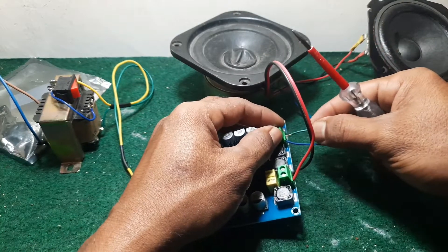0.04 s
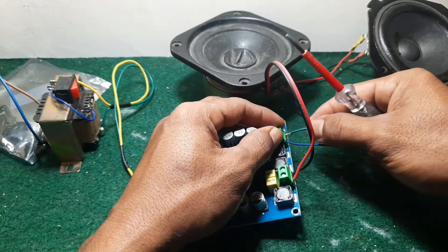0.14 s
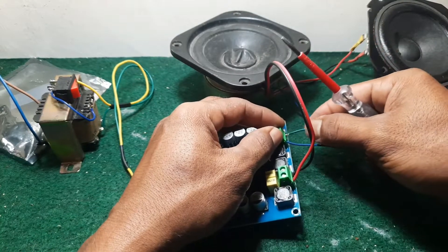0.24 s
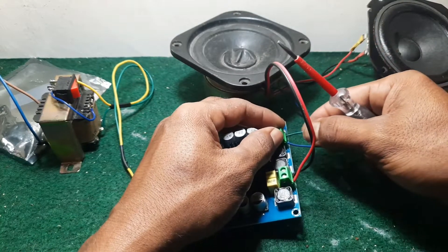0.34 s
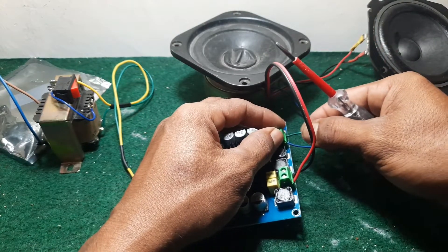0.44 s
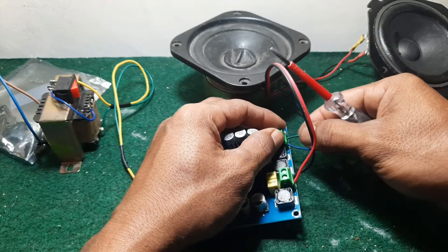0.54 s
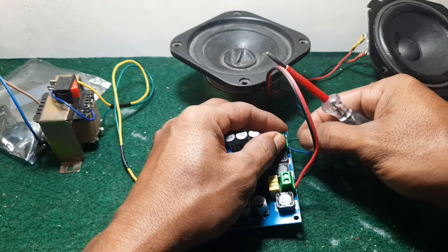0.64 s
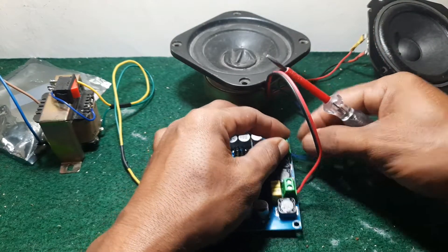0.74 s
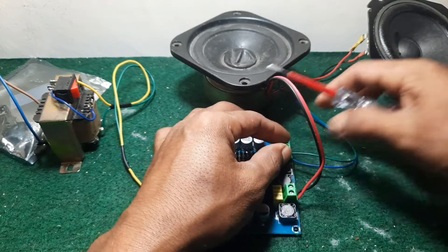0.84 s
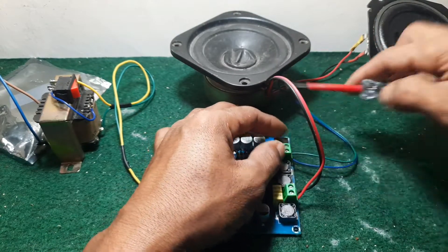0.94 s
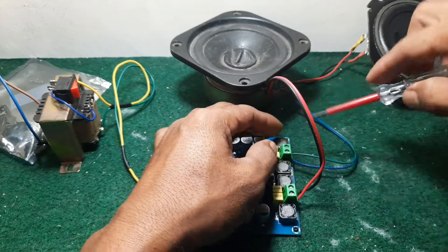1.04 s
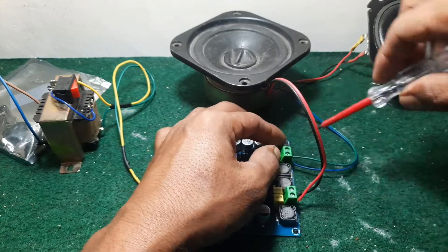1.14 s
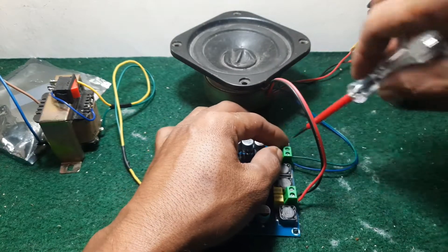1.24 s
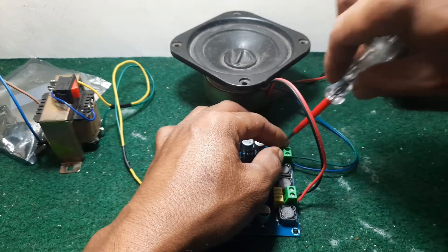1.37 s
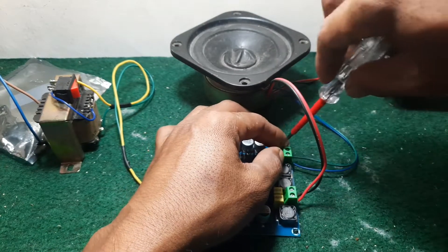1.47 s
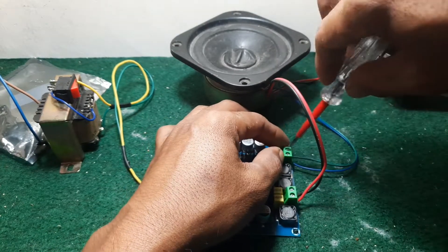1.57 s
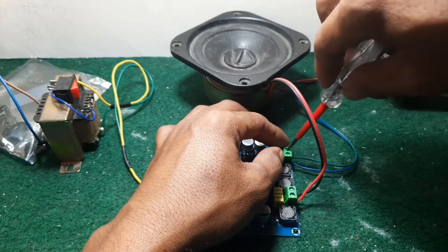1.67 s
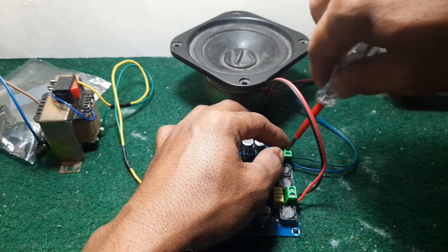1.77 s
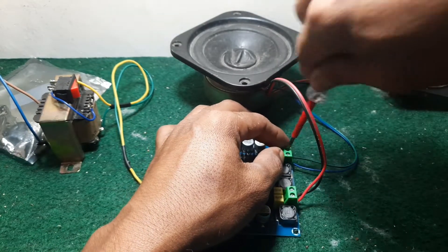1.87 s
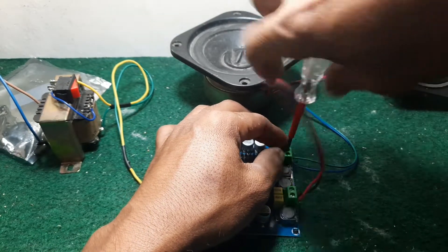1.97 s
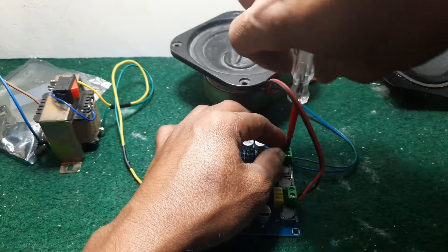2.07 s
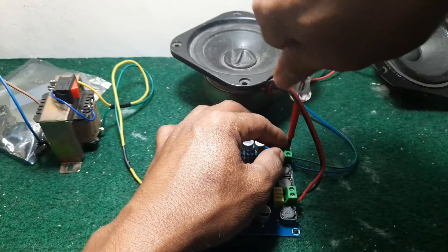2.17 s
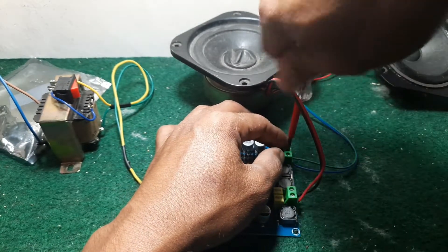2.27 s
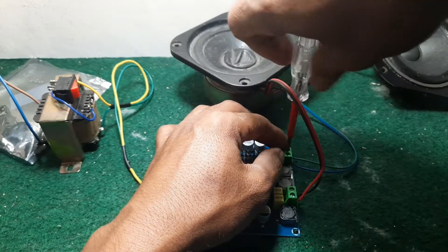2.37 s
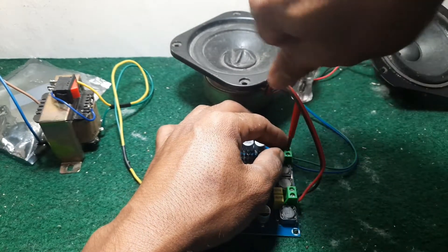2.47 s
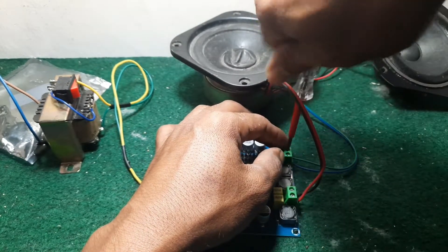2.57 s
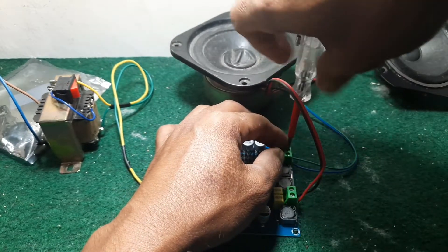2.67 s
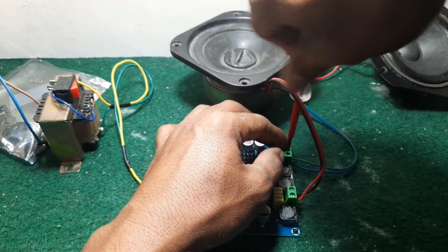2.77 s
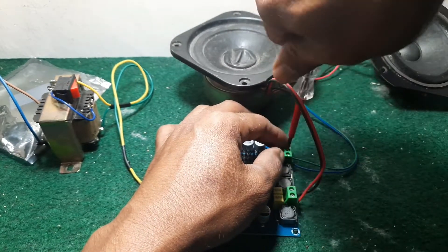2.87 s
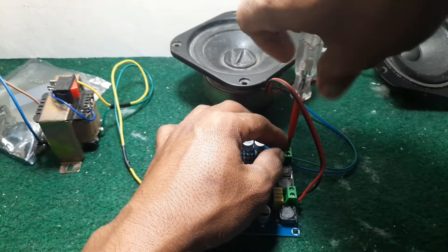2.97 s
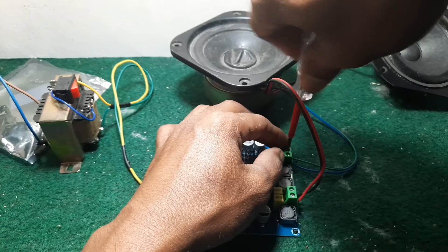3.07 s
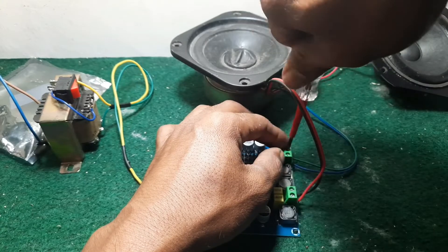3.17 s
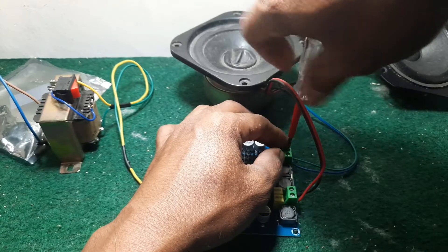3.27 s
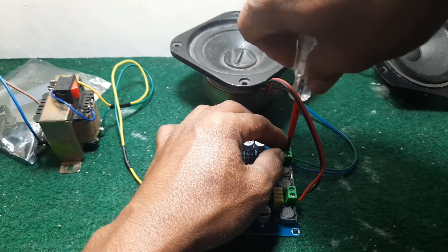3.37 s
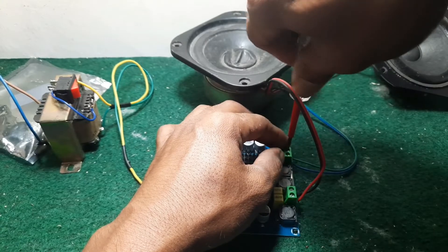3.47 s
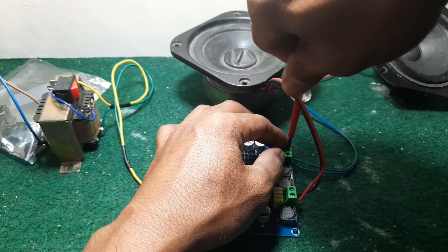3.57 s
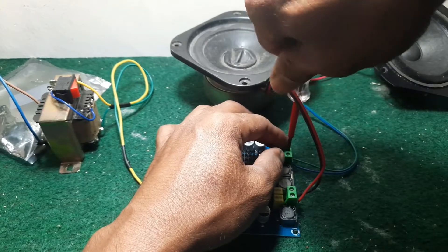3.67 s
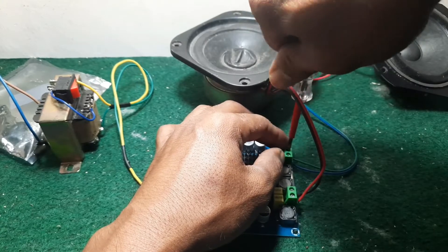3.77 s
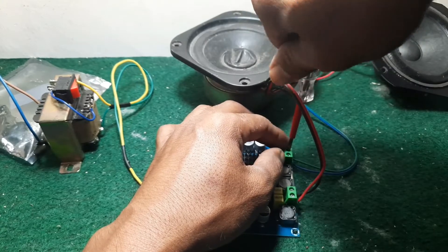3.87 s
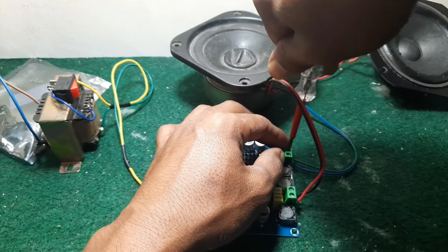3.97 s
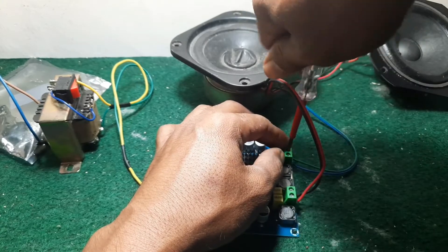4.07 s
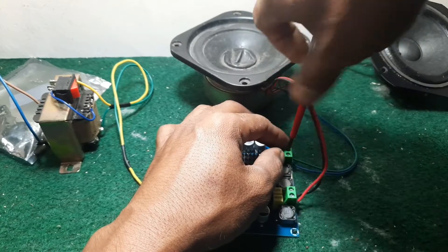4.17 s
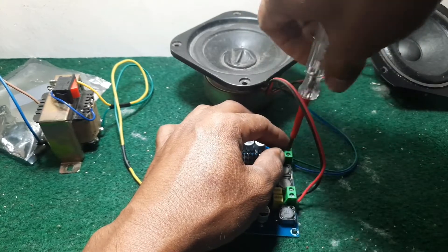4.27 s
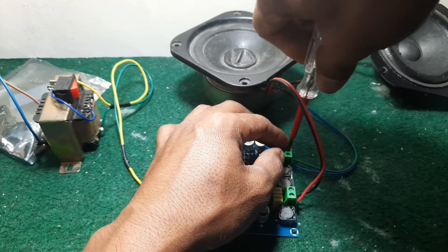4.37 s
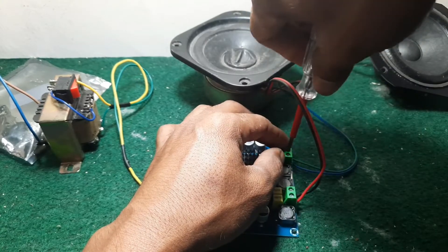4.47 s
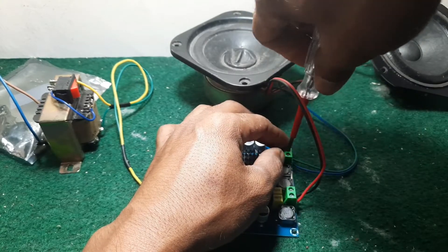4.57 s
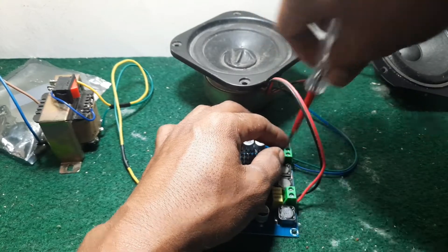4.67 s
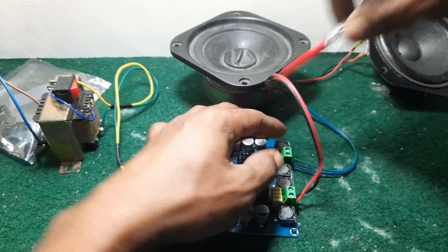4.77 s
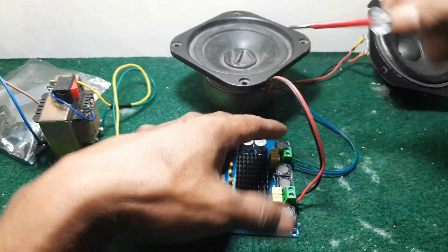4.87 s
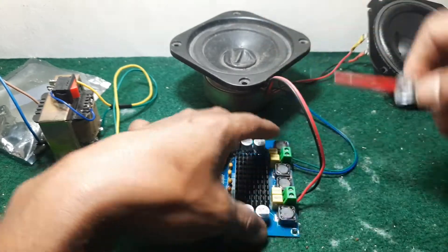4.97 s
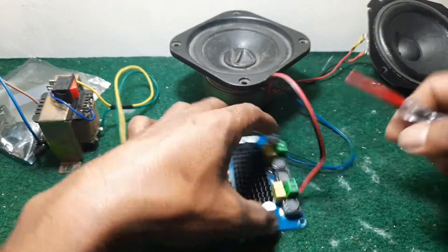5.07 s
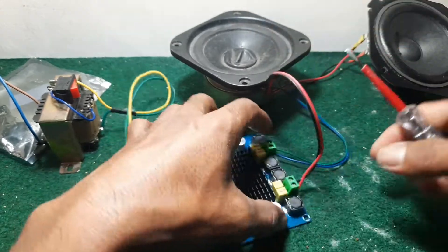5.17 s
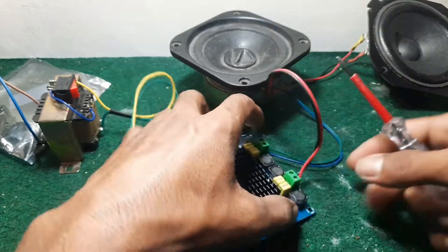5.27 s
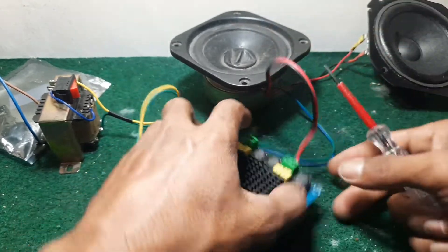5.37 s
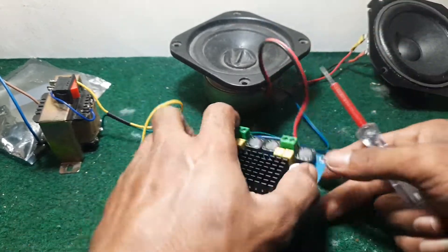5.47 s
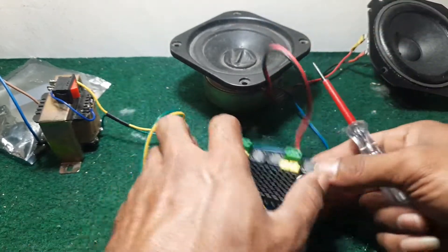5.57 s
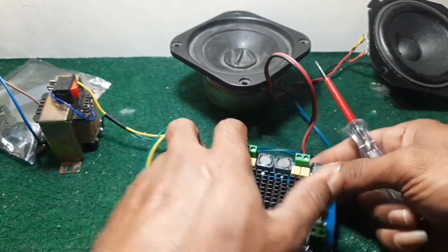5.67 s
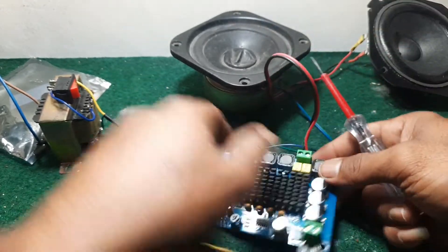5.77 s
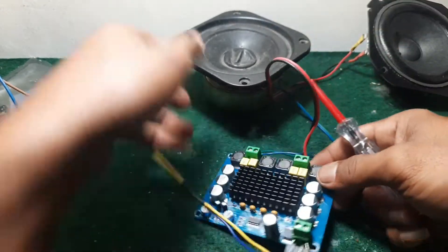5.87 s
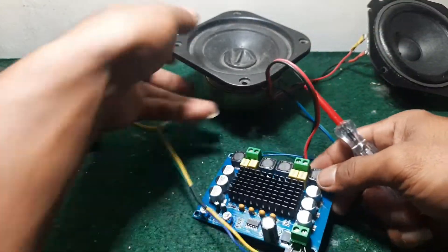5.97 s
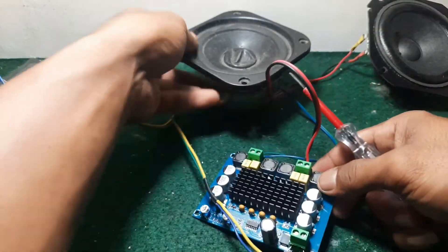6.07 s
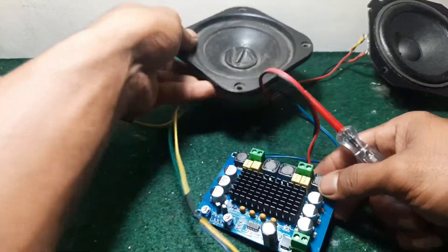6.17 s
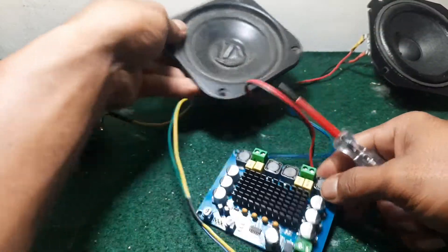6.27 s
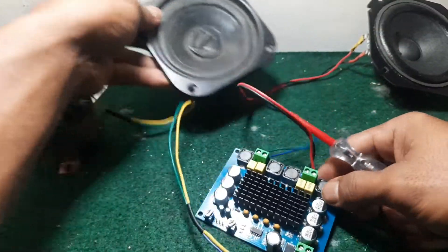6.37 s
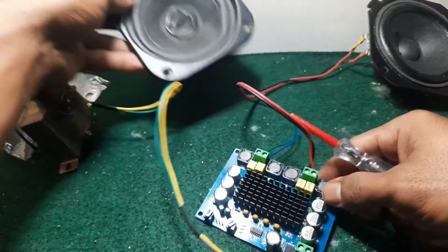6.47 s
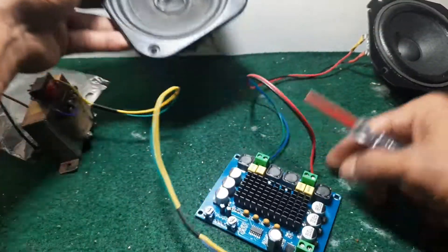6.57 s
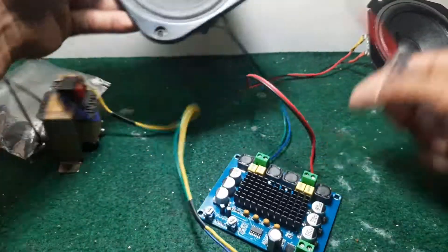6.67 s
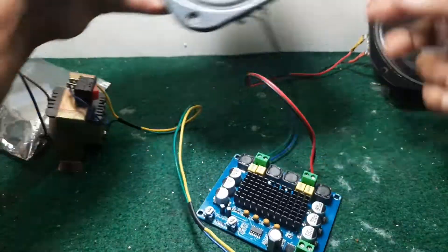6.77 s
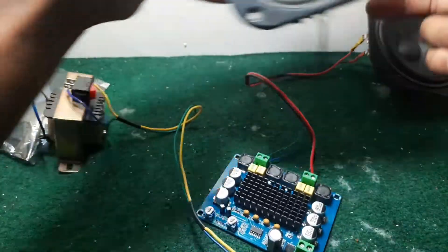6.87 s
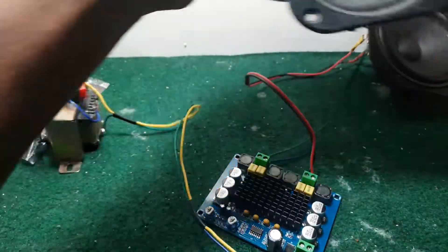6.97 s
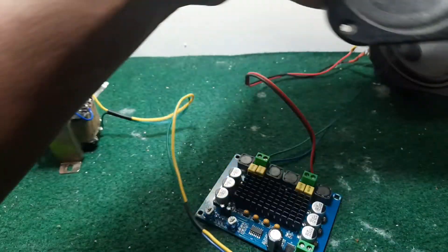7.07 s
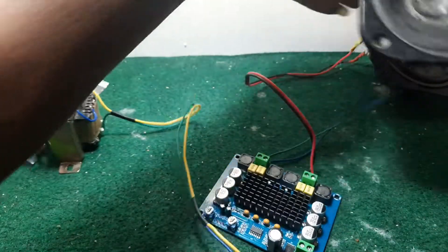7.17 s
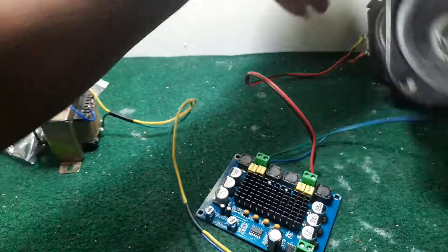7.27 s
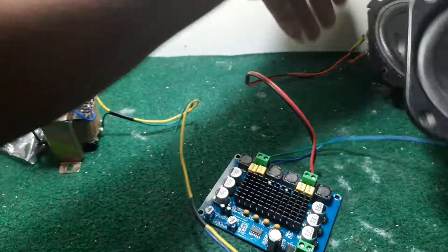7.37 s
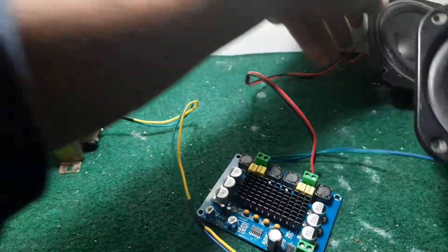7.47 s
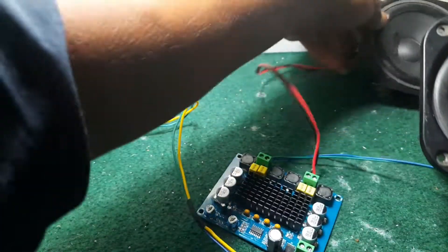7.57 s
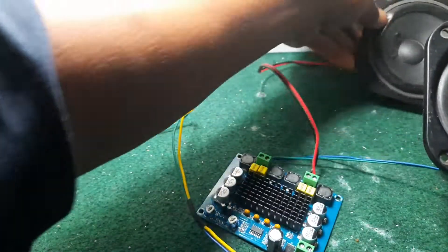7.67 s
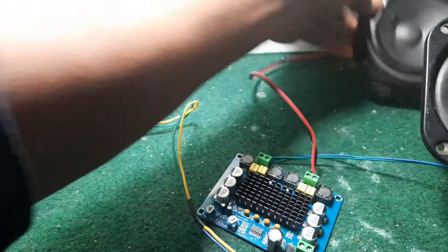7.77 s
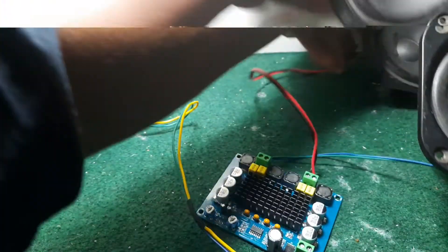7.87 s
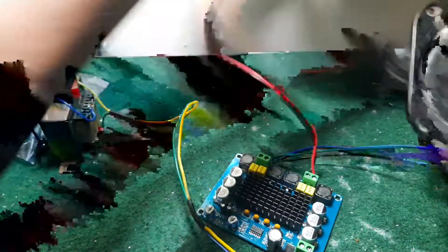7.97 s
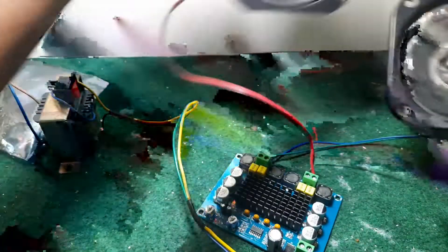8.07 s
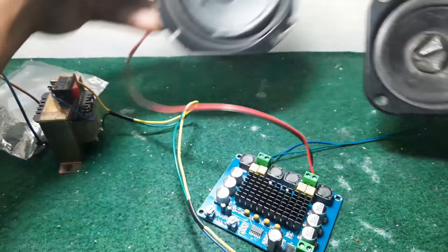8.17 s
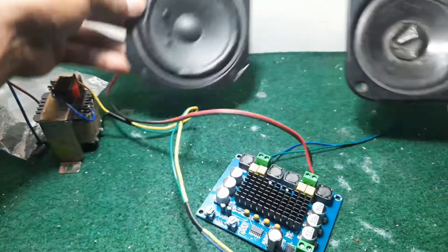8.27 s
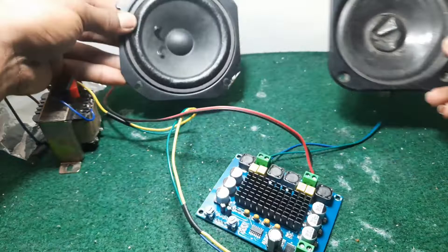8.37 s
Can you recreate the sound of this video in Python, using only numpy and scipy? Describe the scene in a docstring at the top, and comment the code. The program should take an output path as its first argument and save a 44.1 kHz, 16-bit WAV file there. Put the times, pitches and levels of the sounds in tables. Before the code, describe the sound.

Low room hum and hiss, soft bench thumps and faint screwdriver ticks, then sharp clicks, rustling drags, a thin squeak and heavier knocks close up.

```python
"""A low room hum under microphone hiss, and the rumble of hands leaning on a carpeted bench, are heard first.
Close to a two-microphone phone standing there, hands fit wires into screw terminals: ticks are noise cracks
ringing a board, rustles are grainy noise, and knocks ring the bench modes and set loose things rattling.
Steel clinks are ringing modes; creaks and a very high squeak are wavering sines. Rows of small ticks chatter.
A short room tail follows the ticks, clinks and squeaks."""
import sys
import numpy as np
from scipy import signal
from scipy.fft import rfft, irfft
from scipy.io import wavfile
from scipy.ndimage import uniform_filter1d

SR = 44100
rng = np.random.default_rng(int(sys.argv[2]) if len(sys.argv) > 2 else 0)


def to_wav(s):
    """Save 16-bit WAV."""
    ch = np.atleast_2d(s).T  # columns
    pcm = np.round(np.clip(ch, -1, 1) * 32767)  # PCM
    wavfile.write(sys.argv[1], SR, pcm.astype(np.int16))


N = 371757

# blows on the bench; the lean favours the low modes:
# start_s, level_db, lean_db_per_octave, contact_ms
BLOWS = [(0.6, -23, 11, 1.2), (1.753, -20.5, -7, 2), (1.804, -17.5, -7, 2.3), (1.8113, -8.5, -0.5, 2.9),
         (2.016, -18, 2, 3.4), (2.206, -21.5, -8.5, 2.8), (2.331, -9.5, -3.5, 3.7), (2.658, -6.5, 4, 4.4),
         (2.969, -18.5, -8.5, 3.1), (3.326, -8, -1.5, 3.7), (3.426, -27, -5, 1.8), (3.457, -15, -9, 5.2),
         (3.646, -16, 0.5, 2), (4.017, -9, 9, 1.6), (4.078, -21, -11.5, 1.7), (4.176, -29, -11, 2.3),
         (4.196, -10.5, 0.5, 1.8), (4.374, -18, -7.5, 2.5), (4.698, -15, -6.5, 3.8), (4.867, -26, 3, 2),
         (5.097, -11.5, 13, 8.1), (5.792, -19, 9, 2.1), (5.897, 3, 11.5, 1.65), (6.403, -9.5, 17.5, 3.9),
         (6.417, -7.5, 12, 2.9), (6.635, 10.5, 6.5, 3.5), (6.662, -20, 16.5, 2.2), (6.756, -7.5, 10, 6.2),
         (6.768, -24, 11, 4.2), (6.83, -20, 15, 3.7), (6.835, -29, -16, 1.2), (7.106, -22, -3.5, 1.6)]
# ringing modes of the circuit board: mode_hz, level_db, t60_s
BOARD_MODES = [(970, -19.5, 0.0034), (1050, -2, 0.025), (1180, -7, 0.012), (1360, 5, 0.021),
               (1490, 0, 0.033), (1800, 13.5, 0.0079), (2036, 15, 0.021), (2360, 2.5, 0.01),
               (2700, -1, 0.012), (3040, 14.5, 0.021), (4600, -15, .04)]


def undb(db):
    """Turn decibels into an amplitude factor."""
    return 10 ** (np.asarray(db) / 20)


def unit(x):
    """Scale to an rms of 1."""
    return x / np.sqrt(np.mean(x ** 2))


def peak1(x):
    """Scale each channel to a peak of 1."""
    return x / np.abs(x).max(axis=-1, keepdims=True)


def butter(x, order, hz, kind):
    """Filter x with a Butterworth high-pass or band-pass."""
    return signal.sosfilt(signal.butter(order, hz, kind, fs=SR, output="sos"), x)


def on_log(table, hz):
    """Read a (Hz, value) table along a log axis."""
    table_hz, values = np.transpose(table)
    return np.interp(np.log(hz + 1), np.log(table_hz), values)


def colour(x, table):
    """Weight the spectrum of x by a (Hz, dB) table."""
    size = x.shape[-1]
    hz = np.arange(size // 2 + 1) * SR / size
    return irfft(rfft(x) * undb(on_log(table, hz)), size)


def ring(x, hz, t60_s):
    """Drive one decaying mode with x: a unit impulse rings with amplitude 1."""
    pole = np.exp(2j * np.pi * hz / SR - np.log(1000) / (t60_s * SR))
    return signal.lfilter([1], [1, -pole], x, axis=-1).imag


def walk(rate, size=N):
    """Random levels held 1 / rate s and smoothed twice; spread near 1."""
    hold = int(SR / rate)
    steps = np.repeat(rng.standard_normal(size // hold + 1), hold)
    return 1.3 * uniform_filter1d(uniform_filter1d(steps, hold), hold)[:size]


def lean_sides(pan_db):
    """Left and right gains that differ by pan_db, left minus right."""
    return undb(np.array([pan_db, -pan_db]).reshape(2, -1) / 2)


def ports(near, other, pan_db, alike):
    """Left hears near; right hears it 0.35 ms later, partly replaced by another signal."""
    late = np.roll(near, int(0.00035 * SR))
    right = np.sqrt(alike) * late + np.sqrt(1 - alike) * other
    return np.array([near, right]) * lean_sides(pan_db)


def tone(s, hz, db, waver, flicker_db):
    """A sine follows its pitch and rms level, wavering and flickering as the contact slips."""
    out = np.zeros(N)
    span = np.arange(int(s[0] * SR), int(s[-1] * SR))
    t = span / SR
    pitch = uniform_filter1d(np.interp(t, s, hz), size=400)
    pitch *= 1 + waver * walk(320, size=len(span))
    level_db = np.interp(t, s, db) + flicker_db * walk(130, size=len(span))
    out[span] = np.sin(2 * np.pi * np.cumsum(pitch) / SR) * undb(level_db)
    return np.sqrt(2) * out


def hum():
    """Low room noise fades into microphone hiss, with narrow tones; left and right agree mainly in the bass."""
    # spectrum of the room and the hiss: hz, relative_density_db
    floor_shape = [(15, -74), (25, -23), (108, -2.5), (130, -12), (161, 1), (206, -14), (249, -7.5),
                   (373, -15.5), (476, -18.5), (1020, -28), (1440, -36), (1890, -37.5), (3820, -51),
                   (10100, -53), (16000, -51.5)]
    # narrow bands standing out of it: centre_hz, width_hz, level_db
    narrow_tones = [(99, 5, -48), (295.4, 5, -54), (490.8, 7.4, -59), (553, 21, -62.5), (784, 7.6, -66.5),
                    (2830, 46, -82.5), (7050, 600, -78.5)]
    # agreement of the two microphones, held within 0 to 0.99 below: hz, likeness (no unit)
    likeness = [(60, 0.98), (130, 1), (290, 0.85), (640, 0.24), (1410, -0.0029), (3100, -2), (6820, -0.38),
                (15000, -1.3)]
    floor_db = -41.5
    hz = np.arange(N // 2 + 1) * SR / N
    power = undb(2 * on_log(floor_shape, hz))
    power *= undb(2 * floor_db) / power.sum()
    for tone_hz, width_hz, level_db in narrow_tones:
        bell = np.exp(-.5 * ((hz - tone_hz) / (width_hz / 2)) ** 2)
        power += undb(2 * level_db) * bell / bell.sum()
    alike = np.clip(on_log(likeness, hz), 0, .99)
    # the sum and the difference of the microphones share out the power
    noise = rfft(rng.standard_normal((2, N))) * np.sqrt(power * N / 2)
    mid, side = noise * np.sqrt([1 + alike, 1 - alike]) / np.sqrt(2)
    return irfft(np.array([mid + side, mid - side]), N) * undb(.4 * walk(3))


def bench():
    """Half-cycle blows and a shaking push drive the bench modes, which carry them to both microphones."""
    # ringing modes of the bench top: mode_hz, level_db, t60_s, left_minus_right_db
    bench_modes = [(72.5, -9, 0.077, 4), (88.6, -1.5, 0.3, 2), (105.3, -5.5, 0.18, 2.5),
                   (114.9, 3, 0.24, -0.5), (166, -3, 0.29, 4), (194.3, -5.5, 0.18, -1.5),
                   (220.7, -6, 0.28, 5), (248.6, -1, 0.46, 4.5), (300, -7, 0.11, -8),
                   (332.4, -21, 0.51, 13), (402, -11, 0.15, 2), (486, -16, 0.17, 11), (574, -28, 0.028, 5),
                   (808, -27, 0.036, -10), (1030, -26, 0.031, -20)]
    # hands leaning and twisting on the bench: start_s, rumble_db
    pressure = [(0.0, -41.5), (0.3, -58.5), (0.59, -46), (1.55, -42), (1.76, -36), (2.05, -44),
                (2.42, -35.5), (3.73, -40.5), (4.06, -28), (4.44, -46), (4.8, -36), (5.73, -38),
                (5.87, -38.5), (6.46, -35), (6.6, -47), (6.76, -32), (7.1, -49), (8.43, -41.5)]
    shake_damp = 0.63  # leaning hands shorten the ring, as a share of t60
    settle_s, settle_t60_s = 0.078, 0.17  # what struck the bench comes to rest on it and chokes the ring
    t, out = np.arange(N) / SR, 0
    pushing = undb(np.interp(t, *np.transpose(pressure)))
    after = t[:SR // 2]
    impulse = np.where(after == 0, 1.0, 0.0)
    choke = 1000 ** (-np.maximum(after - settle_s, 0) / settle_t60_s)
    shares = undb(np.array(bench_modes)[:, 1])
    for hz, level_db, t60_s, pan_db in bench_modes:
        blows = np.zeros(N)
        for at, blow_db, lean_db, contact_ms in BLOWS:
            push = np.hanning(int(contact_ms * SR / 1000) + 2)
            i = int(at * SR)
            blows[i:i + len(push)] -= push / push.sum() * undb(blow_db - lean_db * np.log2(hz / 130))
        struck = signal.oaconvolve(blows, ring(impulse, hz, t60_s) * choke)[:N]
        unsteady = rng.standard_normal(N) * undb(1.8 * walk(8.0))
        shake = unit(ring(unsteady, hz, shake_damp * t60_s))
        mode = struck / shares.sum() + shake / np.sqrt(shares @ shares) * pushing
        out = out + undb(level_db) * lean_sides(pan_db) * mode
    # the knocks and the rumble carry no deep bass
    return butter(out, 4, 75., "high")


def ticks():
    """Each tick is a crack of noise round its own centre, ringing the board modes near the struck spot's pitch."""
    # ticks of tip, screw, board and wire ends:
    # start_s, level_db, crack_centre_hz, struck_pitch_hz, ring_re_level_db, left_minus_right_db
    single_ticks = [(0.383, -52, 2550, 923, -11, -1), (0.5584, -36, 7000, 1230, -55, 2),
                    (0.5606, -29, 10500, 1230, -55, 3), (0.568, -30, 11600, 1120, -50, -2),
                    (0.585, -36, 7000, 1110, -52, 6), (0.604, -24, 10800, 910, -64, 0),
                    (0.6162, -42, 11000, 910, -50, 2), (0.633, -44, 9000, 910, -50, 2),
                    (1.19, -44, 9910, 1020, 3, -3), (1.628, -54, 2530, 1340, 18, 0),
                    (1.6918, -43, 2880, 1120, -6, -1), (1.746, -41, 3500, 1300, 5, -2),
                    (1.751, -32.5, 11200, 1330, -5, 1), (1.8104, -23.5, 7160, 1500, -0.5, 3.5),
                    (1.8107, -32, 3660, 1390, 4, -2), (2.0886, -38, 3840, 1370, 4.5, 3),
                    (2.121, -42, 3740, 915, -14, 5), (2.206, -37, 12100, 1220, -5, 3),
                    (2.671, -30.5, 9600, 1006, 0.5, -4), (2.816, -49, 2530, 1520, 12, 0),
                    (2.856, -41, 10200, 1010, -10, 2), (3.1075, -27.5, 8500, 1030, -4.5, 0),
                    (3.124, -31, 8500, 1090, -7, 1.2), (3.3251, -49, 3770, 1000, 14, -3),
                    (3.453, -47, 2500, 1900, 6, 8), (3.46, -38, 2970, 990, 5, -3),
                    (4.0164, -32, 10400, 902, -24, -7), (4.0745, -41, 11800, 1020, -17, -2.5),
                    (4.177, -42.5, 9120, 1060, 10.5, 4), (4.2027, -41, 3860, 1030, 12, -4),
                    (4.379, -45.5, 2930, 1070, 12.5, -1), (4.7649, -31.5, 4700, 1330, -5, -7),
                    (4.77, -36, 4700, 890, -21, -5), (4.8707, -13.5, 4170, 1400, -25, -0.5),
                    (4.874, -24, 9300, 1550, -20, 26), (5.052, -29, 9800, 930, -20, 2),
                    (5.109, -28, 10100, 1070, -14, -5), (5.1174, -35, 12600, 1000, -26, 7),
                    (5.1414, -22, 10500, 1490, -14, -1), (5.15, -30, 8500, 1490, -12, 0),
                    (5.156, -25.5, 10000, 1820, -2, 12), (5.165, -16, 10600, 2240, -11.5, -1),
                    (5.18, -22, 10000, 1600, -3, 1), (5.1942, -26, 8500, 1990, -3, 3),
                    (5.2088, -34, 9000, 1900, -8, -3), (5.2585, -24, 3940, 1790, -6, 3),
                    (5.2628, -23, 11000, 1790, -10, 5), (5.28, -24, 7500, 1160, -11, 3),
                    (5.2917, -21.5, 7500, 1460, -2.5, 2), (5.3018, -34, 10000, 1500, -9, 0),
                    (5.3183, -23.5, 9000, 1120, -11, 1), (5.3414, -23.5, 8300, 1050, -5, -5),
                    (5.349, -28.5, 3900, 1800, -7, 2), (5.435, -16, 7700, 910, -15, 2),
                    (5.456, -22, 10800, 2050, -12, 3), (5.6582, -33, 11800, 1090, -34, 6),
                    (5.8718, -25, 9500, 1070, -25, 3), (6.079, -36, 10800, 1050, -12, -1),
                    (6.172, -28.5, 3870, 970, -4.5, 6), (6.365, -36, 8480, 902, -11, 5),
                    (6.423, -42, 2600, 966, -14, -3), (6.5227, -33.5, 6900, 1380, -3.5, 8),
                    (6.637, -39, 8580, 1020, 1, -3.5), (6.788, -24.5, 7300, 940, -25, 15),
                    (6.797, -32, 4000, 1000, 2, 3), (6.8054, -13, 5100, 1020, -9.5, 7.5),
                    (6.818, -27, 4500, 2700, -2, 3), (6.8252, -26, 3200, 2000, 5, -5),
                    (6.8623, -17.5, 3540, 980, 0.5, 0), (6.869, -26, 4500, 2000, -8, 4),
                    (6.8744, -23, 2300, 2360, -2, 8), (6.9005, -11.5, 5740, 1033, 3, 2),
                    (6.9115, -28, 3200, 1490, -9, 1), (6.923, -39, 4500, 2000, -5, 3),
                    (7.018, -39, 2900, 990, 4, -9), (7.028, -37, 2750, 1800, -4, 0),
                    (7.043, -32.5, 4900, 1050, 5, 4), (7.056, -34, 2400, 2360, 0, 0),
                    (7.0716, -29, 3700, 1240, 3, 6), (7.1062, -9, 7000, 1100, -12, 7),
                    (7.1089, -16, 3000, 1240, -1.5, -3), (7.1187, -27, 4380, 2330, -3, 6),
                    (7.204, -41, 3000, 1210, 8, 4), (7.592, -43, 3040, 907, -30, 4),
                    (7.656, -39, 3020, 1180, -3, 3), (8.1924, -40, 8400, 991, 0, 2)]
    tail_t60_s, bounce_db = 0.0074, -10.5
    bright_db = -3.5  # treble of the crack, re the tick's level
    dull_db, dull_per_ring = -8, 0.37  # lower part of the crack; it grows with the ring of the board
    out, t = np.zeros((2, N + SR)), np.arange(SR // 25) / SR
    snap = np.exp(-t / 0.001) * np.minimum(t / 0.00011, 1)
    for at, level_db, crack_hz, pitch_hz, ring_db, pan_db in single_ticks + chatter():
        # each tick touches twice, 1.4 to 4.8 ms apart
        bounce = np.roll(snap, int(rng.uniform(0.00136, 0.00476) * SR))
        envelope = snap + undb(bounce_db) * bounce + 0.073 * 1000 ** (-t / tail_t60_s)
        grit = rng.standard_normal((2, len(t))) * envelope
        grit[:, 4] += 1.8  # sharp spike of the first contact
        around = signal.butter(2, [crack_hz / 1.355, crack_hz * 1.3], "band", fs=SR)
        crack = 0.64 * peak1(signal.lfilter(*around, grit))
        crack += undb(bright_db) * peak1(butter(grit, 2, 8000., "high"))
        dull = peak1(butter(grit, 2, [1400., 7000.], "band"))
        crack += undb(dull_db + dull_per_ring * ring_db) * dull
        body = 0
        for hz, mode_db, t60_s in BOARD_MODES:
            # modes far from the struck pitch are weaker, and each tick detunes them
            size = undb(mode_db - 37 * abs(np.log2(hz / pitch_hz)))
            body = body + size * ring(grit + 0.66 * snap, hz * rng.normal(1, 0.028), t60_s)
        tick = (crack + undb(ring_db) * peak1(body)) * undb(level_db)
        i = int(at * SR)
        out[:, i:i + len(t)] += ports(*tick, pan_db, 0.042)
    # small parts radiate no bass
    return butter(out[:, :N], 2, 750., "high")


def rustle():
    """Fibres and skin slip as dense grains of uneven size: a bright hiss and a duller scrape."""
    # skin and sleeves on the carpet, then board and loudspeakers dragged over it:
    # start_s, hiss_db, scrape_re_hiss_db
    dragging = [(1.6, -94, 29), (1.81, -61, 2), (1.95, -72, 6), (2.3, -65, 2), (2.55, -86, 3),
                (2.8, -64, -2), (3.3, -89, -5), (3.86, -87, 5), (4.01, -56, -19), (4.25, -72, 1),
                (4.75, -88, -9), (4.95, -48, -10), (5.07, -59, -0.5), (5.3, -51, 0), (5.48, -47.5, -3.5),
                (5.6, -63, 0.5), (5.9, -70, -5), (6.31, -53, 0), (6.7, -62.5, 5.5), (6.81, -69, -11.5),
                (6.99, -58, -14), (7.072, -48, -3), (7.24, -49.5, -17), (7.4, -73, 2)]
    # single rubs of finger, handle or wire; rise and fall each span 13.9 dB:
    # peak_s, hiss_db, rise_s, fall_s, scrape_re_hiss_db
    single_rubs = [(0.389, -57, 0.025, 0.073, -8), (0.564, -53.5, 0.0065, 0.12, -15),
                   (0.87, -52.5, 0.046, 0.072, -4), (1.199, -61, 0.0082, 0.084, -7),
                   (1.812, -46.5, .0085, 0.033, -4), (2.05, -64, 0.016, 0.068, 7),
                   (2.096, -47, 0.037, 0.023, -10), (2.25, -50, 0.074, 0.049, -17),
                   (2.363, -56, 0.035, 0.043, -5), (2.556, -49.5, 0.036, 0.066, -21),
                   (2.674, -48.5, 0.013, 0.035, -12), (2.865, -49, 0.034, 0.067, -8),
                   (3.002, -53, 0.029, 0.056, -3), (3.117, -50.5, 0.01, 0.1, -2),
                   (3.336, -54.5, 0.021, 0.054, 3), (3.462, -52.5, 0.011, 0.041, 1),
                   (4.019, -53, .008, 0.07, -8), (4.083, -50.5, 0.023, 0.061, -14),
                   (4.224, -53.5, 0.087, 0.072, -3), (4.388, -64.5, 0.031, 0.12, 10),
                   (4.771, -54, 0.02, 0.079, 3.5), (4.872, -32.5, 0.0041, 0.043, -8),
                   (5.059, -41, 0.0069, 0.014, -20), (5.116, -36, 0.019, 0.012, -19),
                   (5.168, -28.5, 0.017, 0.051, -6.5), (5.21, -29, 0.049, 0.0054, -9),
                   (5.292, -29.5, 0.0069, 0.021, -5), (5.705, -49, 0.1, 0.15, 0.5),
                   (5.869, -47, 0.061, 0.11, -2), (5.97, -52.5, 0.0092, 0.046, -16),
                   (6.09, -42.5, 0.016, 0.095, -21), (6.224, -49.5, 0.099, 0.019, 4.5),
                   (6.366, -40.5, 0.082, 0.086, -12), (6.639, -53, 0.046, 0.046, -8),
                   (6.813, -35, 0.042, 0.012, -15), (6.835, -52, 0.02, 0.03, 15),
                   (6.868, -46, 0.0066, 0.026, 4), (6.905, -27.5, 0.012, 0.024, -7),
                   (7.038, -45.5, 0.015, 0.0091, -7), (7.11, -31, 0.0077, 0.033, -4),
                   (7.259, -43, 0.091, 0.006, -20), (7.661, -46, 0.038, 0.048, -4.5),
                   (7.764, -56, 0.13, 0.062, 1)]
    # spectrum of the hiss: hz, relative_density_db
    hiss_shape = [(2000, -0.5), (3500, -4), (5500, -7), (7500, -1.5), (10000, -1), (13000, -3),
                  (14800, -11.5), (15500, -0.5)]
    # spectrum of the scrape before the board rings: hz, relative_density_db
    scrape_shape = [(600, -39), (1000, 2), (1450, -4), (2000, -6), (3000, -16), (4500, -14), (6000, -39.5)]
    t = np.arange(N) / SR
    grain = undb(2.2 * rng.exponential(size=N) + 2.3 * walk(150) + 1.5 * walk(30))

    def grains(shape):
        """Colour fresh noise under the shared grain sizes and place it before the microphones."""
        noise = unit(colour(grain * rng.standard_normal((2, N)), shape))
        return ports(*noise, 1, 0.016)

    hiss, scrape = grains(hiss_shape), grains(scrape_shape)
    # what scrapes also rings the board, and it catches and lets go
    body = unit(sum(undb(db) * ring(scrape, hz, t60_s) for hz, db, t60_s in BOARD_MODES))
    scrape = unit(scrape + 0.35 * body) * undb(3.3 * walk(70))
    s, hiss_db, scrape_db = np.transpose(dragging)
    drag_db = np.interp(t, s, hiss_db, -150, -150)
    hiss_power = undb(2 * drag_db)
    scrape_power = undb(2 * (drag_db + np.interp(t, s, scrape_db)))
    for at, hiss_db, rise_s, fall_s, scrape_db in single_rubs:
        near = slice(int((at - .3) * SR), int((at + .5) * SR))
        since = t[near] - at
        away = np.where(since < 0, -since / rise_s, since / fall_s)
        rub_db = hiss_db - 13.9 * away ** 0.85
        hiss_power[near] += undb(2 * rub_db)
        scrape_power[near] += undb(2 * (rub_db + scrape_db))
    return np.sqrt(hiss_power) * hiss + np.sqrt(scrape_power) * scrape


def rattle():
    """Things lying on the bench jump and settle just after each blow: a swell of low noise."""
    rattle_db, swell_s = -37.5, 0.014  # re the blow's level; time to the swell's peak
    t, blows = np.arange(SR // 8) / SR, np.zeros(N)
    at, level_db = np.transpose(BLOWS)[:2]
    blows[(at * SR).astype(int)] = undb(level_db + rattle_db)
    settle = signal.fftconvolve(blows, t / swell_s * np.exp(1 - t / swell_s))[:N]
    noise = unit(butter(rng.standard_normal((2, N)), 2, [175, 448], "band"))
    return ports(*noise * settle, 2.6, 0.38)


def creaks():
    """Stick-slip gives a rough tone and its second harmonic, drawn afresh for each channel."""
    # the tip creaks in the screw slot, later the loudspeaker frame as it is set down; one list for each:
    # start_s, pitch_hz, level_db, second_harmonic_re_first_db
    creak_paths = [
        [(2.025, 1340, -75, -15), (2.04, 1400, -59, -19), (2.06, 1580, -61, -23), (2.085, 1750, -65, -19),
         (2.1, 1780, -75, -15)],
        [(7.03, 1850, -73, -10), (7.05, 1764, -49, -14.5), (7.07, 1790, -59, -15), (7.089, 1870, -46, 2),
         (7.104, 1910, -48, -2), (7.125, 2170, -45, -1), (7.15, 2050, -54, -13), (7.18, 2040, -61, -15),
         (7.19, 2050, -77, -15)],
    ]
    out = np.zeros((2, N))
    for path in creak_paths:
        s, hz, level_db, second_db = np.transpose(path)
        for channel in out:
            channel += tone(s, hz, level_db, .07, 5.)
            channel += tone(s, 2 * hz, level_db + second_db, .02, 5.)
    return ports(*out, 2.5, 0.27)


def clinks():
    """Hard, gritty contacts ring the modes of shaft and handle; the changing grip detunes them each time."""
    # the steel screwdriver leaves the terminal; the lean favours the low modes:
    # start_s, level_db, lean_db_per_octave
    steel_contacts = [(4.765, -40, -5.5), (4.7707, -56, 3), (4.8707, -22, -1.5), (4.8752, -17, 12)]
    # modes of shaft and handle, whose decay is shortened below: mode_hz, level_db, full_t60_s
    steel_modes = [(1520, -7, 0.052), (2660, -13, 0.045), (4260, -19, 0.04), (4520, -6, 0.039),
                   (4900, -25, 0.04), (7100, -21, 0.046), (8300, -35, 0.05), (10200, -35, 0.037)]
    out, t = np.zeros((2, N)), np.arange(SR // 8) / SR
    envelope = np.exp(-t / 0.0031) + 0.067 * np.exp(-t / 0.02)
    for at, level_db, lean_db in steel_contacts:
        i = int(at * SR)
        for hz, mode_db, t60_s in steel_modes:
            grit = rng.standard_normal((2, len(t))) * envelope
            grit /= np.sqrt(np.sum(grit ** 2, axis=1, keepdims=True))
            size = undb(level_db + mode_db - lean_db * np.log2(hz / 1460))
            out[:, i:i + len(t)] += size * ring(grit, hz * rng.normal(1, 0.0098), 0.85 * t60_s)
    return ports(*out, 0.5, 0.13)


def chatter():
    """Rows of small contacts at uneven moments, each with its own size, colour and struck spot, for ticks()."""
    # loose wires and frames chatter while things are dragged:
    # start_s, end_s, first_level_db, last_level_db, ring_re_level_db, contacts (count)
    chatter_runs = [(5.158, 5.21, -29, -30, -4, 20), (6.812, 6.859, -31, -31, -2, 11),
                    (6.913, 6.955, -29, -48, 1, 7), (7.02, 7.104, -42, -31, 2, 11),
                    (7.11, 7.181, -30, -47, -1, 14)]
    spread_db = 5  # either way
    rows = []
    for start, end, first_db, last_db, ring_db, count in chatter_runs:
        for k, (when, size, crack, spot) in enumerate(rng.random((int(count), 4))):
            at = start + (end - start) * (k + when) / count
            level_db = np.interp(at, [start, end], [first_db, last_db]) + spread_db * (2 * size - 1)
            rows.append((at, level_db, 2600 * 2 ** (1.64 * crack), 950 * 2 ** (1.4 * spot), ring_db, 2.2))
    return rows


def squeaks():
    """Three strands stick and slip, each a sine at its own very high pitch."""
    # the board is slid round, then faintly a loudspeaker's wire drags; one list for each:
    # start_s, low_hz, middle_hz, high_hz, low_db, middle_db, high_db
    squeak_paths = [
        [(5.33, 9300, 10200, 11900, -83, -80, -61), (5.36, 9400, 10300, 12000, -90, -62, -59),
         (5.385, 9600, 11000, 12700, -93, -55, -56), (5.414, 9900, 10850, 12400, -85, -54, -66),
         (5.44, 10200, 11150, 12930, -73, -54, -85), (5.474, 10300, 11770, 13500, -72, -53, -80),
         (5.51, 10300, 11720, 13900, -64, -50.5, -71), (5.548, 10340, 12060, 14000, -67, -48, -69),
         (5.576, 10650, 12060, 13850, -65, -45, -66), (5.61, 10400, 11340, 13950, -62, -61, -63),
         (5.626, 10350, 11450, 13300, -63, -57, -63), (5.648, 10300, 11080, 12600, -59, -53, -66),
         (5.664, 10160, 11520, 12900, -62, -57, -80), (5.68, 10040, 11450, 13000, -61, -52, -67),
         (5.726, 10400, 11580, 13380, -63, -54, -65), (5.746, 10300, 11000, 13000, -60, -54, -64),
         (5.78, 9950, 10800, 12750, -63, -60, -66), (5.81, 9900, 10900, 12500, -66, -62, -85),
         (5.86, 9400, 10500, 12100, -85, -58, -95)],
        [(8.09, 7100, 8200, 10150, -85, -95, -99), (8.12, 7250, 8250, 10500, -75, -83, -99),
         (8.14, 7200, 8350, 10500, -80, -75, -99), (8.155, 7200, 9000, 10650, -82, -76, -99),
         (8.19, 7100, 9050, 10550, -88, -86, -83), (8.2, 7200, 9110, 10470, -99, -95, -71),
         (8.22, 7000, 9050, 9900, -99, -95, -75), (8.24, 7100, 9050, 9500, -99, -82, -91.5),
         (8.258, 7100, 9040, 9900, -99, -71, -95), (8.275, 7100, 9000, 9800, -99, -88, -77),
         (8.3, 7100, 9000, 9500, -99, -99, -88), (8.33, 7100, 9000, 10300, -99, -99, -77),
         (8.355, 7100, 9000, 10540, -99, -99, -69), (8.38, 7200, 9000, 10500, -99, -99, -74),
         (8.405, 7000, 9000, 9950, -99, -99, -76), (8.425, 7200, 9000, 9750, -99, -99, -81)],
    ]
    waver, flicker_db = .0045, 3.5  # share of the pitch; level
    out = np.zeros(N)
    for path in squeak_paths:
        s, *columns = np.transpose(path)
        for hz, level_db in zip(columns[:3], columns[3:]):
            out += tone(s, hz, level_db, waver, flicker_db)
    return ports(out, -np.roll(out, 1), 7, 0.17)


def room(x):
    """Walls return a short decaying noise tail, unrelated at the two microphones."""
    t60_s, tail_db = 0.42, -9
    t = np.arange(SR // 2) / SR
    # hz, relative_db
    shape = [(700, 2.5), (1500, 4.1), (2050, 7.5), (2500, 12.2), (6000, 1.0), (15000, 2.7)]
    tail = colour(rng.standard_normal((2, len(t))), shape)
    tail *= 1000 ** (-t / t60_s) * (t > .002)
    tail *= undb(tail_db) / np.sqrt(np.sum(tail ** 2, axis=1, keepdims=True))
    return signal.fftconvolve(x, tail, axes=1)[:, :N]


def scene():
    """Sum the close sounds, their room tail and the hum, which leans to the left."""
    hits, steel, thin = ticks(), clinks(), squeaks()
    near = hits + steel + thin + creaks() + rustle() + bench() + rattle()
    return near + room(hits + 0.98 * steel + 2.9 * thin) + hum() * lean_sides(2 * 1.46)


def record(dry):
    """The phone cuts the deepest bass and the top, and sets the level 1 dB down."""
    trimmed = butter(dry, 2, 30, "high")
    top = signal.ellip(8, .2, 70, 15300, fs=SR, output="sos")
    return signal.sosfilt(top, trimmed * undb(-1))


dry = scene()
out = record(dry)
to_wav(out)
```